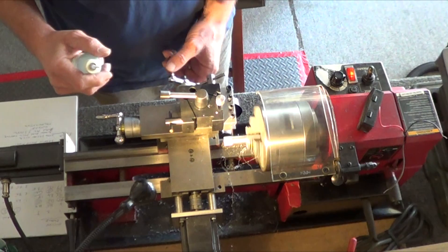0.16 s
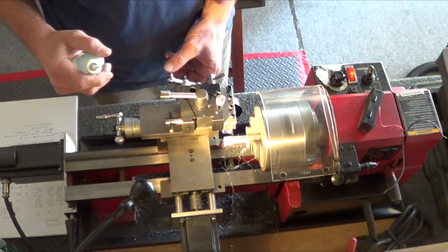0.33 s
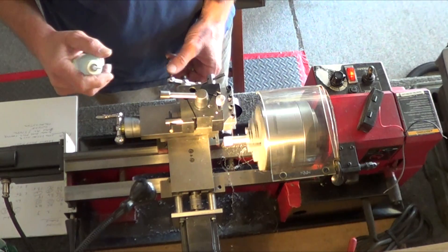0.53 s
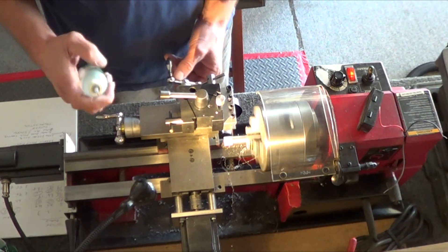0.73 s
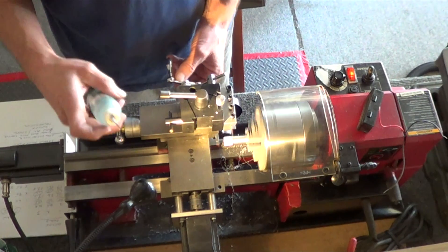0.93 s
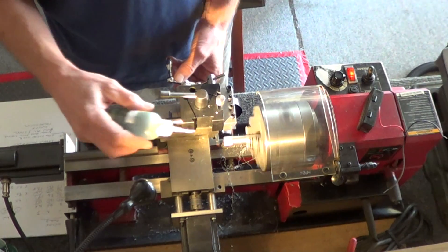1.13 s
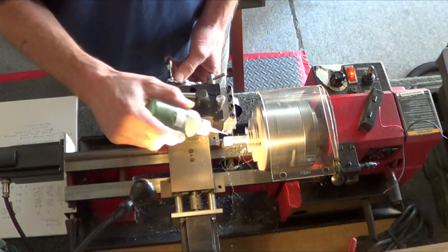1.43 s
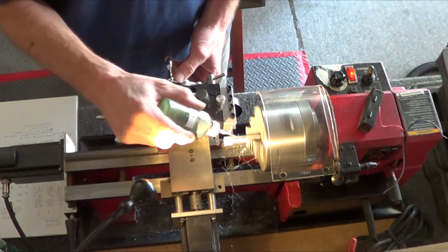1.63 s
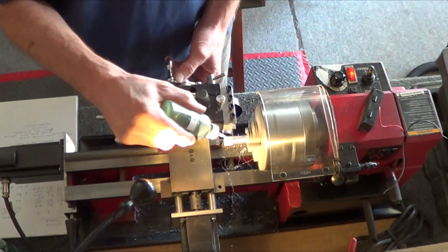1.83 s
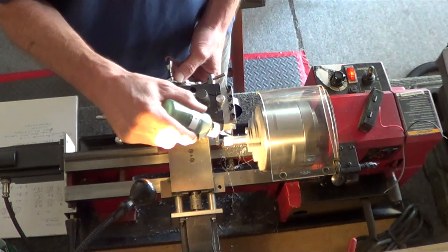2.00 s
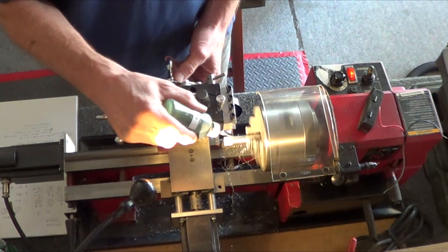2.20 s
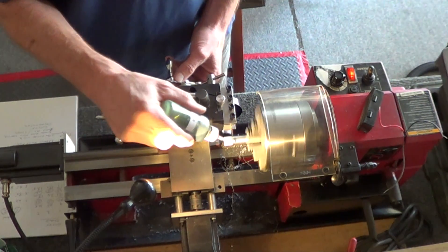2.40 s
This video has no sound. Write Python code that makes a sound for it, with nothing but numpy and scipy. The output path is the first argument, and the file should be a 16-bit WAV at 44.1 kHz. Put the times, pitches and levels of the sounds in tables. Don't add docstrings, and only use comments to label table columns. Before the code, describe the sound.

Bench lathe running in a workshop, steady motor hum and gear rattle with rhythmic scraping, chirping squeaks

```python
import sys
import numpy as np
from scipy import signal
from scipy.fft import rfft, irfft
from scipy.io import wavfile
from scipy.ndimage import uniform_filter1d

SR = 44100
rng = np.random.default_rng(int(sys.argv[2]) if len(sys.argv) > 2 else 0)


def store_pcm(level_fs):
    pcm = np.round(np.clip(level_fs, -1, 1) * 32767).astype(np.int16)
    wavfile.write(sys.argv[1], SR, np.atleast_2d(pcm).T)


def rack_gain(trim_db):
    fader = np.asarray(trim_db, float)
    return 10 ** (fader / 20)


N = 112454
T = np.arange(N) / SR
TURN_S, FIRST_CUT_S = 0.1695, 0.2452

# columns t/s, level/dB
MOTOR_LOAD = [(0, -5.5), (.2, -4), (.45, -1), (.85, 0), (1.2, -0.5), (1.8, 0.5), (2.55, -0.5)]


def level(x, db):
    return x * rack_gain(db) / np.sqrt(np.mean(x ** 2))


def walk(rate):
    hold = int(SR / rate)
    held = np.repeat(rng.standard_normal(N // hold + 1), hold)
    slewed = uniform_filter1d(uniform_filter1d(held, hold), hold)
    return 1.2 * slewed[:N]


def colour(x, table):
    hz, db = np.array(table, float).T[:2]
    log_f = np.log(np.fft.rfftfreq(N, 1 / SR) + 1)
    return irfft(rfft(x) * rack_gain(np.interp(log_f, np.log(hz), db)), N)


def ring(x, hz, width_hz, count=1):
    for _ in range(count):
        x = signal.lfilter(*signal.iirpeak(hz, hz / width_hz, fs=SR), x)
    return x


def grains(per_s, spread_db):
    struck = rng.random(N) < per_s / SR
    sizes = rng.standard_normal(N) * rack_gain(spread_db * rng.exponential(size=N))
    return level(struck * sizes, 0)


def body(x, modes, flicker_db):
    out = np.zeros(N)
    for hz, width_hz, db in modes:
        mode = level(ring(x, hz, width_hz, count=2), db)
        out += mode * rack_gain(flicker_db * walk(14.04))
    return out


def free_decay(s, db, hz, t60_s, rise_s):
    u = np.maximum(T - s, 0)
    envelope = rack_gain(db - 60 * u / t60_s) * (1 - np.exp(-(u / rise_s) ** 2))
    return 2.41 * envelope * np.sin(2 * np.pi * hz * u)


def turn_swell():
    return rack_gain(1.3 * np.cos(2 * np.pi * (T - FIRST_CUT_S - 0.02) / TURN_S))


def motor_hum():
    tone_hz = [62, 72.9, 120, 193.8, 240, 290.6, 360, 480, 531, 770, 1010.6, 2142, 3271, 3340, 3680, 3923,
               4281.2, 3264.7, 4275.3, 8082.8, 8112.5]
    # columns level/dB, phase wander/rad, flicker/dB
    tones = [(-56.5, 0.44, 3), (-53.5, 0.36, -2), (-62, 0.16, -1), (-52, 0.57, 2), (-47, 0.22, 2),
             (-49.5, 1.07, 3), (-43.5, 0.3, 0), (-50, 0.29, -1.5), (-52, 0.35, 2.5), (-57.5, 0.35, 3),
             (-46, 0.19, 1), (-54, 0.33, 6), (-48, 0.35, 0.7), (-52.5, 1.2, 0), (-58.5, 0.9, 3),
             (-65, 0.92, -1), (-49, 0.27, 1.1), (-57, 0.52, 1), (-58, 0.28, 2), (-64, .4, 1),
             (-66, 0.76, 3)]
    hum = np.zeros(N)
    for hz, (db, wander_rad, flicker_db) in zip(tone_hz, tones):
        strength = np.sqrt(2) * rack_gain(db + flicker_db * walk(15))
        phase = 2 * np.pi * (hz * T + rng.random()) + wander_rad * walk(24.86)
        hum += strength * np.sin(phase)
    return hum * rack_gain(0.3 * np.interp(T, *np.array(MOTOR_LOAD).T))


def whine():
    whine_hz = (15734.3, 15747.2)
    whine_db = (-63.5, -68)
    null_s = 1.904
    low, high = [rack_gain(db) * np.sin(2 * np.pi * hz * (T - null_s)) for hz, db in zip(whine_hz, whine_db)]
    return np.sqrt(2) * (low - high)


def shaken_bed():
    # columns f/Hz, width/Hz, level/dB
    panels = [(66, 39, -61), (115, 36, -56.5), (189, 55, -49.5), (296, 56, -40.5), (402.5, 67, -42.5),
              (487.5, 82, -43.5), (598.3, 18, -56.5), (937, 256, -49)]
    load_db = np.interp(T, *np.array(MOTOR_LOAD).T)
    return body(rng.standard_normal(N), panels, 2.54) * rack_gain(load_db) * turn_swell()


def gear_rattle():
    # columns f/Hz, width/Hz, level/dB
    casing = [(1363.5, 40, -51.5), (1524, 88, -51), (2199, 310, -45), (2512, 160, -50.5), (3273, 92, -45.5),
              (3494, 180, -44), (3806, 180, -49), (4260, 73, -46.5), (4443, 93, -50.5), (4890, 89, -56.5),
              (6960, 280, -54.5), (8080, 150, -55), (9300, 1300, -56), (10890, 320, -59)]
    teeth = grains(per_s=4000, spread_db=1.84)
    return body(teeth, casing, 0.84) * rack_gain(0.8 * walk(39.6)) * turn_swell()


def air():
    # columns f/Hz, density/dB
    hiss = [(25, -29), (344, -0.5), (695, -21.5), (1020, -12), (3340, -18), (5280, -22), (12000, -25),
            (14500, -29.5)]
    return level(colour(rng.standard_normal(N), hiss), -39) * rack_gain(1.4 * walk(8.6))


def bed_thumps():
    thump_s = [.943, 1.10, 1.13, 1.275, 1.45, 1.635, 1.725, 1.79, 1.95, 2.095, 2.41, 2.28, .765, .45, .40,
               .11, .24]
    # columns level/dB, f/Hz
    thumps = [(-29, 308), (-27.5, 307), (-32.5, 290), (-34, 290.3), (-32, 295), (-30, 300), (-30.5, 350),
              (-28.5, 288), (-29.5, 293), (-31.5, 300), (-33.5, 330), (-35.5, 171.5), (-36.5, 300),
              (-35, 287), (-34.5, 480), (-35.5, 530), (-35.5, 250)]
    return sum(free_decay(s, db, hz, 0.15, 0.0061) for s, (db, hz) in zip(thump_s, thumps))


def driven_modes(x, modes):
    out = np.zeros(N)
    for hz, width_hz, db in modes:
        out += rack_gain(db) * np.sqrt(SR / np.pi / width_hz) * ring(x, hz, width_hz)
    return out / np.sqrt(2)


def cutting():
    # columns deepest bite t/s, scrape, holder, chatter and bite level/dB
    cuts = [(.265, -41.5, -40.5, -54, -61), (.420, -36.5, -42, -42, -39), (.600, -40, -37.5, -37.5, -29),
            (.756, -38.5, -42, -41, -31), (.929, -38.5, -44, -40.5, -32), (1.106, -38, -40.5, -41, -30),
            (1.271, -44, -43.5, -40.5, -35), (1.449, -45.5, -43, -39.5, -23),
            (1.619, -44, -42.5, -38, -22.5), (1.788, -41, -42, -36.5, -18.5),
            (1.958, -38, -43.5, -37.5, -19), (2.090, -52, -71, -43.5, -29), (2.297, -52, -69, -54, -40),
            (2.445, -49, -61, -56, -38)]
    # columns f/Hz, density/dB
    scrape_colour = [(350, -5), (1000, 2.5), (3000, 1.5), (5000, -4), (7000, -2), (9000, -2), (11500, -6),
                     (16000, -13)]
    # columns f/Hz, width/Hz, level/dB
    holder_modes = [(3970, 55, -1.5), (3810, 180, 1), (3550, 97, -0.5), (2294, 270, -7)]
    # columns f/Hz, width/Hz, level/dB
    tip_modes = [(7200, 78, 2), (7400, 120, 5.5), (6420, 110, -16.5), (6820, 170, -1), (7830, 51, -3.5),
                 (8700, 470, -4), (8560, 240, -10)]
    chatter_hz = [7185, 7395]
    contact_s, entry_s, exit_s = 0.058, 0.024, 0.0098
    bite_rise_s, bite_fall_s = 0.0056, 0.0036
    scrape, holder, chatter, bite, squeal = np.zeros((5, N))
    for k, (s, scrape_db, holder_db, chatter_db, bite_db) in enumerate(cuts):
        u = T - FIRST_CUT_S - k * TURN_S
        outside = (np.abs(u) - contact_s / 2) / np.where(u < 0, entry_s, exit_s)
        touch = 1 / (1 + np.exp(np.clip(2.55 * outside, -30, 30)))
        scrape += rack_gain(scrape_db) * touch
        holder += rack_gain(holder_db) * touch
        chatter += rack_gain(chatter_db - 3.5 + 2.4 * np.clip(u / contact_s, -1, 1)) * touch
        dig = rack_gain(bite_db) * np.exp(-((T - s) / np.where(T < s, bite_rise_s, bite_fall_s)) ** 2 / 2)
        bite += dig
        squeal += dig * sum(np.sin(2 * np.pi * hz * (T - s - 0.002)) for hz in chatter_hz)
    slip = grains(6000, 1.6) * rack_gain(2.0 * walk(180))
    rubbing = scrape * level(colour(slip, scrape_colour), 0)
    holder_ring = driven_modes(slip * holder, holder_modes)
    tip_ring = driven_modes(slip * (chatter + 0.056 * bite), tip_modes)
    return rubbing + holder_ring + tip_ring + squeal


def grabs():
    # columns t/s, peak level/dB, f/Hz
    grab_rows = [(.229, -38, 7200), (.384, -37, 7060), (.407, -33, 7400), (.431, -34, 7200),
                 (.553, -34, 7080), (.565, -30, 7150), (0.591, -25.5, 7300), (.606, -29, 7250),
                 (.742, -32, 7200), (.778, -31, 7300), (.903, -41, 7480), (1.076, -41, 7200),
                 (1.096, -36, 7470), (1.246, -32.5, 7150), (1.264, -29, 7440), (1.281, -28, 7250),
                 (1.435, -24, 7260), (1.586, -29, 7400), (1.603, -27, 7150), (1.771, -29, 7370),
                 (1.754, -28, 7350), (1.416, -29, 7370), (2.128, -33, 6250), (2.296, -39, 6150),
                 (.432, -35, 9000), (1.787, -28.5, 8470), (1.957, -30, 8600), (1.942, -18, 7220),
                 (2.262, -37.5, 7340), (.540, -38, 9000), (.778, -29, 7800)]
    out = np.zeros(N)
    for s, db, hz in grab_rows:
        out += rack_gain(db) * np.exp(-((T - s) / 0.0018) ** 2 / 2) * np.sin(2 * np.pi * hz * T)
    return out


def squeaks():
    # columns tightest t/s, level/dB, top f/Hz, half length/s, sag/Hz
    squeak_rows = [(0.428, -46, 6400, 0.05, 400), (0.6, -40, 6600, 0.06, 600),
                   (0.778, -37, 6530, 0.04, 400), (0.944, -45, 6550, .035, 400),
                   (1.114, -41, 6400, .035, 400), (1.925, -44, 6300, .015, 100),
                   (1.763, -42, 6800, .02, 200), (2.127, -43, 6150, 0.038, 200),
                   (2.291, -47, 6130, .055, 480), (2.44, -48, 6100, 0.039, 450),
                   (2.468, -45, 6050, 0.017, 80)]
    out = np.zeros(N)
    rough = (0.9 + 0.4 * walk(300)) * rack_gain(2.5 * walk(90))
    jitter_rad = 0.6 * walk(500)
    for s, db, hz, half_s, sag_hz in squeak_rows:
        u = np.clip((T - s) / np.where(T < s, half_s, 0.55 * half_s), -1.5, 1.5)
        phase = 2 * np.pi * np.cumsum(hz - sag_hz * np.abs(u) ** 1.3) / SR
        out += rack_gain(db - 1.5) * np.exp(-u ** 4) * np.sin(phase + jitter_rad)
    return out * rough


def pings():
    ping_s = [.395, .742, .910, 1.085, .485, .79, 2.310, 2.122, 1.937, 1.750, 1.56, 1.645, .428, .595,
              2.290, 1.583, 1.412, 1.918, 2.41, 2.462]
    # columns level/dB, f/Hz, decay t60/s
    ping_rows = [(-29.5, 3970, 0.079), (-30, 4300, 0.067), (-27, 3950, 0.076), (-30, 3930, 0.065),
                 (-36.5, 1370, 0.08), (-38.5, 1350, 0.13), (-26.5, 2187, 0.04), (-38, 6200, .04),
                 (-33, 7300, 0.027), (-30, 7400, 0.036), (-40, 1500, 0.12), (-31, 1520, 0.05),
                 (-36, 10000, 0.036), (-34, 9100, 0.049), (-44, 7400, .04), (-33, 8100, .03),
                 (-36, 7350, .03), (-36, 7350, 0.032), (-39, 5750, 0.048), (-44, 5200, .04)]
    return sum(free_decay(s, db, hz, t60_s, 0.0048) for s, (db, hz, t60_s) in zip(ping_s, ping_rows))


def dry_ticks():
    # columns t/s, level/dB
    tick_rows = [(1.8852, -30), (2.436, -38)]
    t60_s = 0.033
    snap = level(ring(rng.standard_normal(N), 6500, 9000), 0)
    return snap * sum((T > s) * rack_gain(db - 60 * np.maximum(T - s, 0) / t60_s) for s, db in tick_rows)


def reverberate(x, t60_s):
    tail = rng.standard_normal(N) * rack_gain(-60 * T / t60_s) * (T > 0.001)
    return irfft(rfft(x) * rfft(tail / np.sqrt(np.sum(tail ** 2))), N)


def scene():
    # columns f/Hz, side minus mid level/dB
    side_db = [(30, -28), (110, -6.5), (200, -13), (380, -13), (700, -3), (1290, -11.5), (4400, -12),
               (8500, -12), (11000, -23)]
    steady = motor_hum() + whine() + shaken_bed() + gear_rattle() + air()
    sharp = bed_thumps() + cutting() + grabs() + squeaks() + pings() + dry_ticks()
    direct = steady + sharp
    room = reverberate(direct, t60_s=0.28)
    near = reverberate(sharp, t60_s=0.083)
    far = reverberate(steady, t60_s=1.5)
    mid = direct + rack_gain(-19.5) * room
    side = colour(0.83 * near + far, side_db) - 0.016 * direct
    return np.array([mid + side, mid - side])


def band_limit(x):
    return signal.sosfilt(signal.butter(12, 15830, fs=SR, output="sos"), x)


def record(dry):
    bass_cut = signal.butter(2, 35, "high", fs=SR, output="sos")
    return band_limit(signal.sosfilt(bass_cut, dry))


dry = scene()
out = record(dry)
store_pcm(out)
```